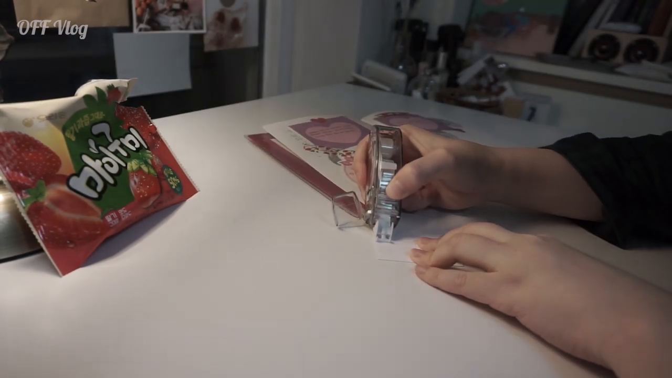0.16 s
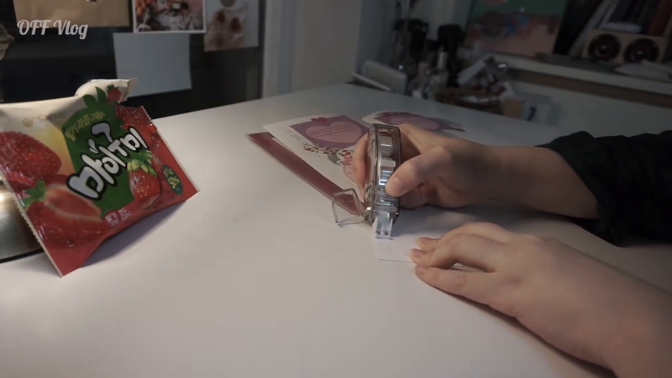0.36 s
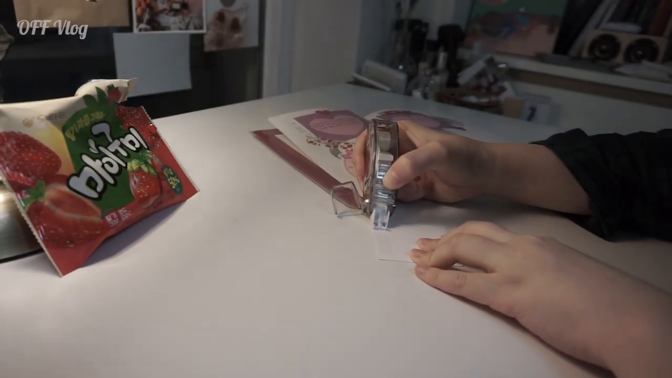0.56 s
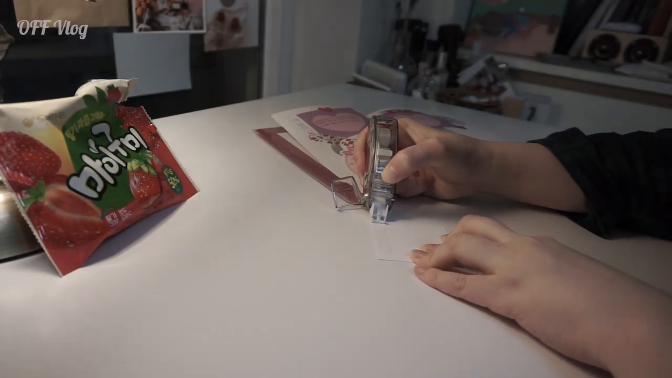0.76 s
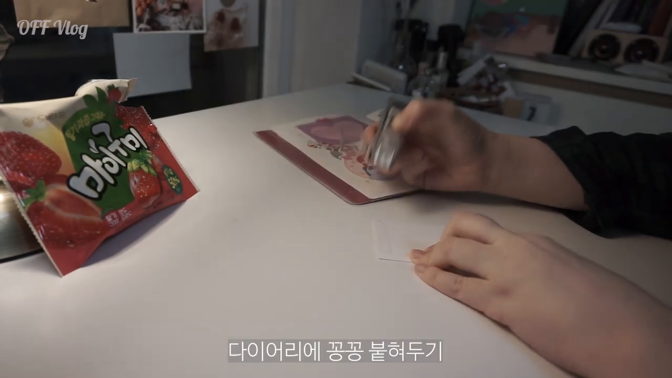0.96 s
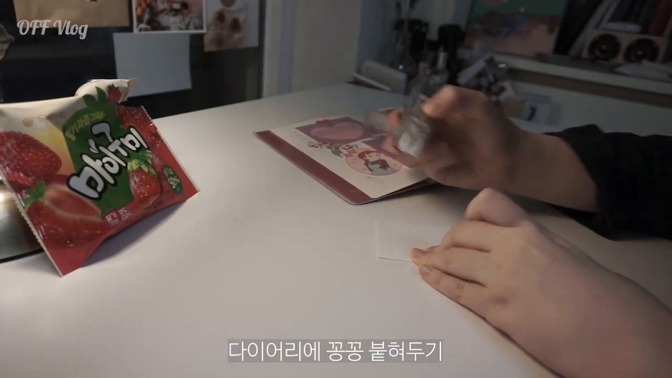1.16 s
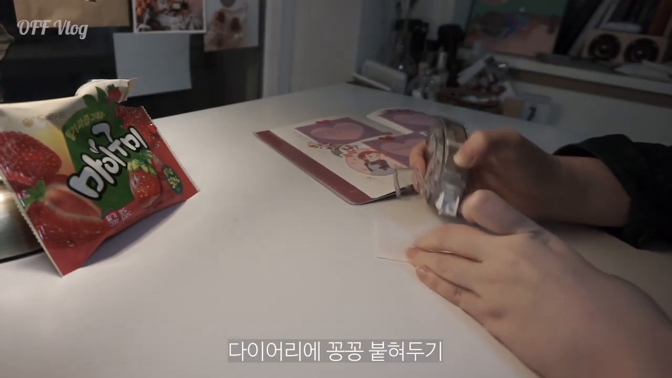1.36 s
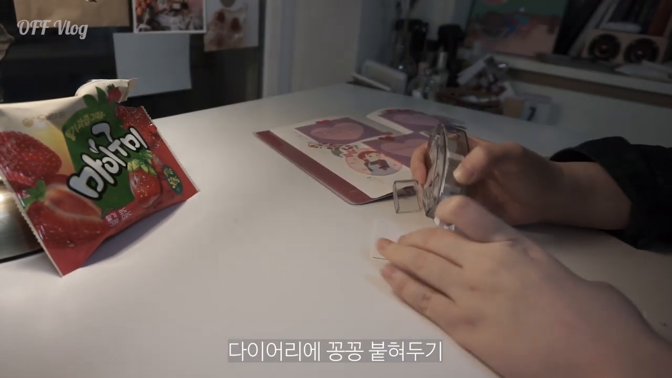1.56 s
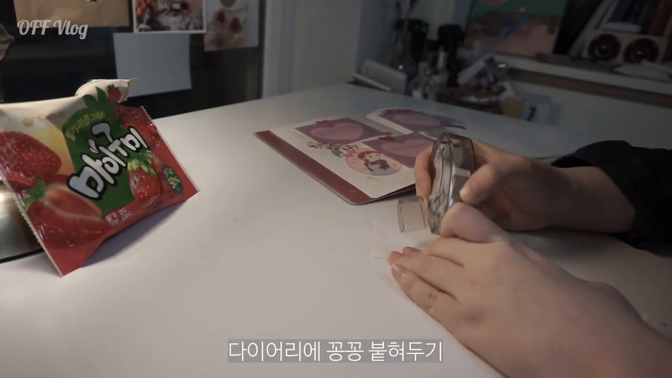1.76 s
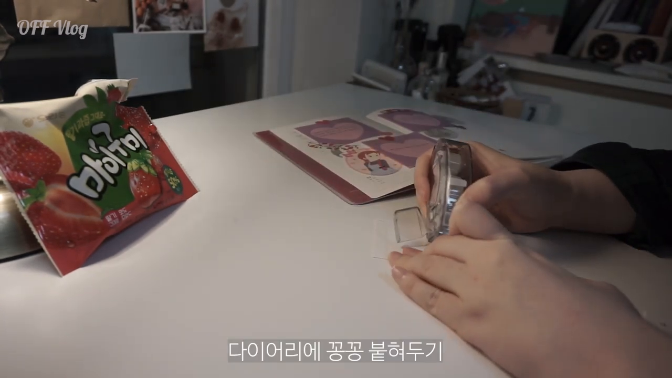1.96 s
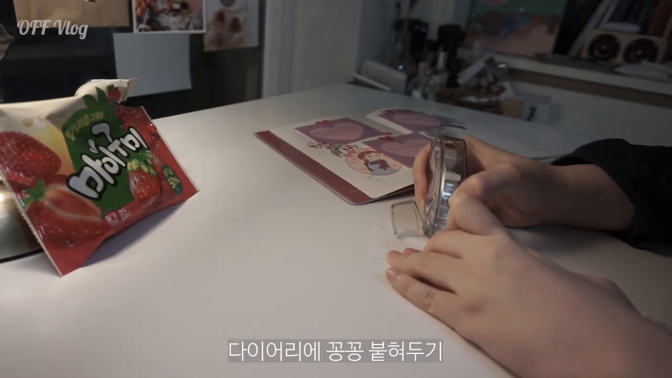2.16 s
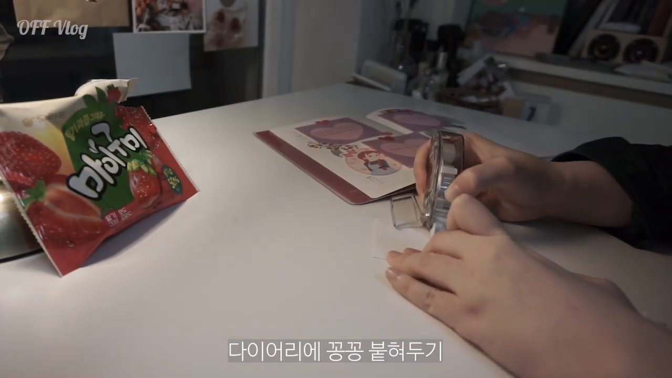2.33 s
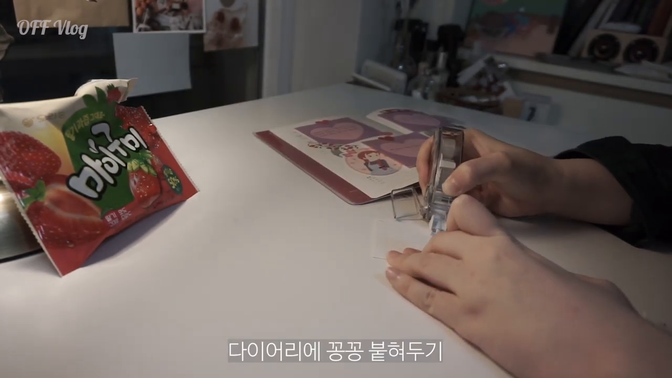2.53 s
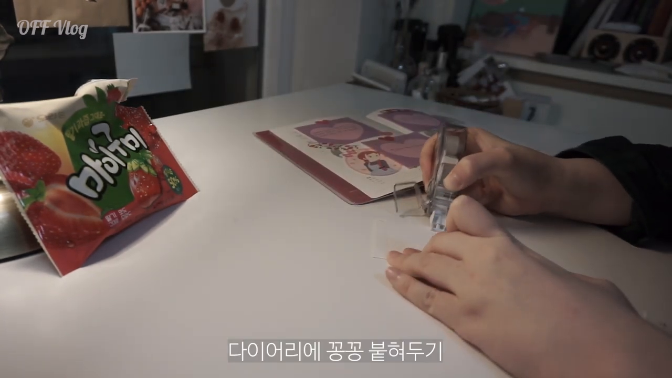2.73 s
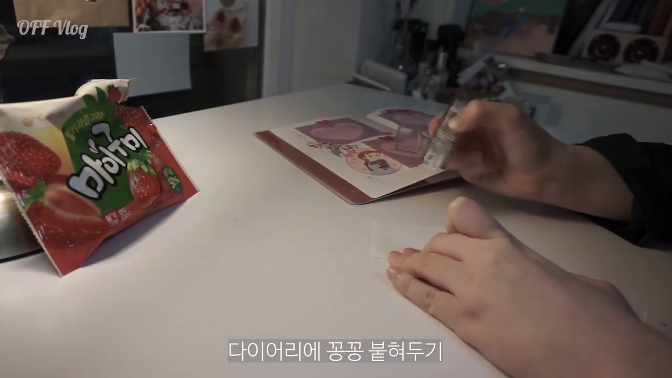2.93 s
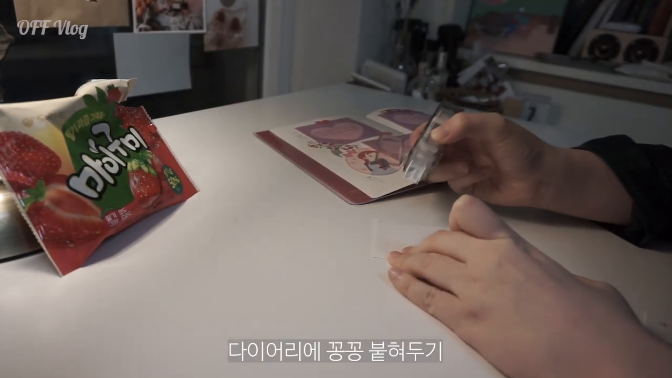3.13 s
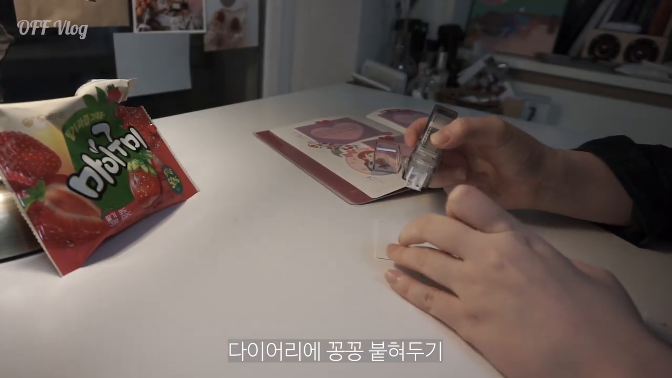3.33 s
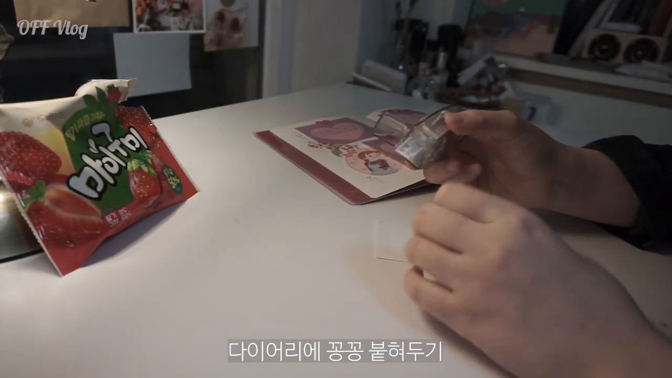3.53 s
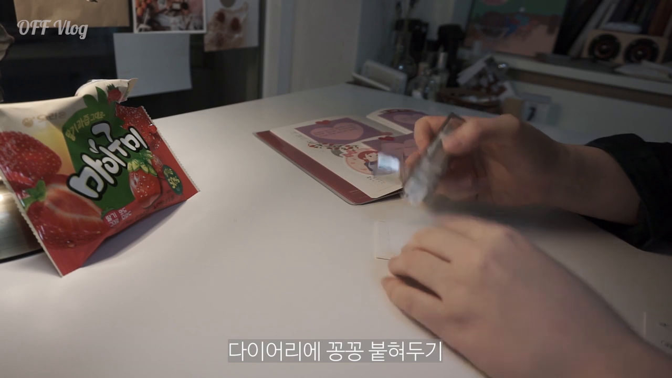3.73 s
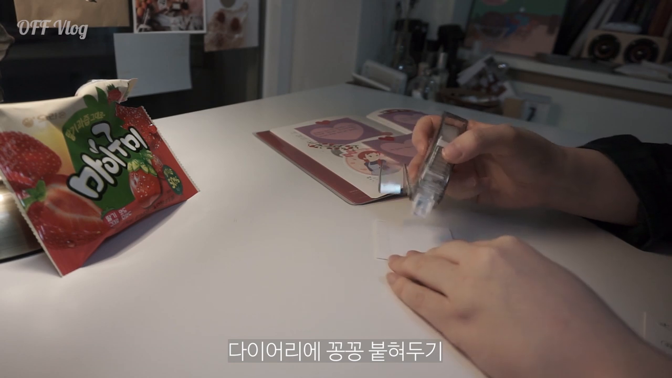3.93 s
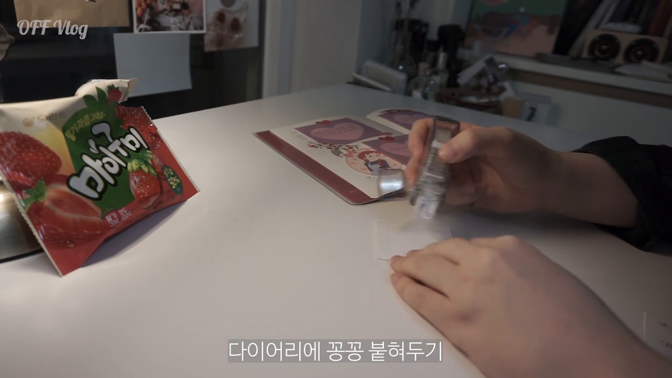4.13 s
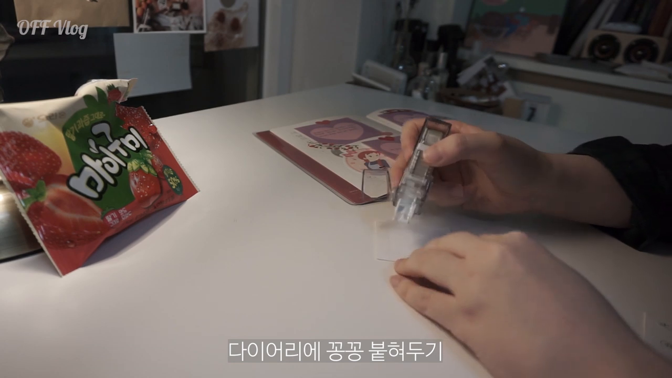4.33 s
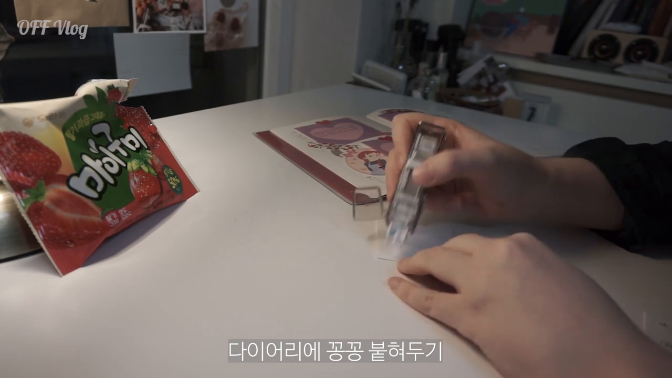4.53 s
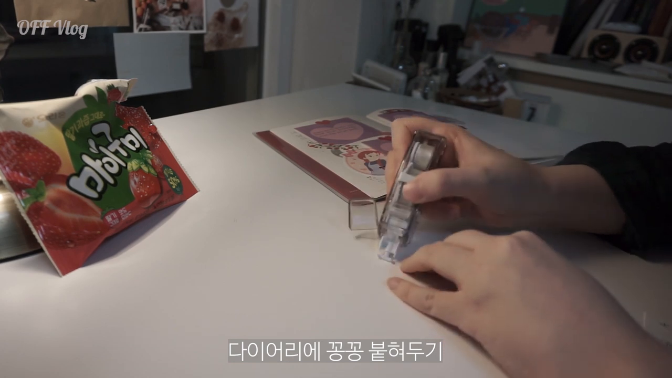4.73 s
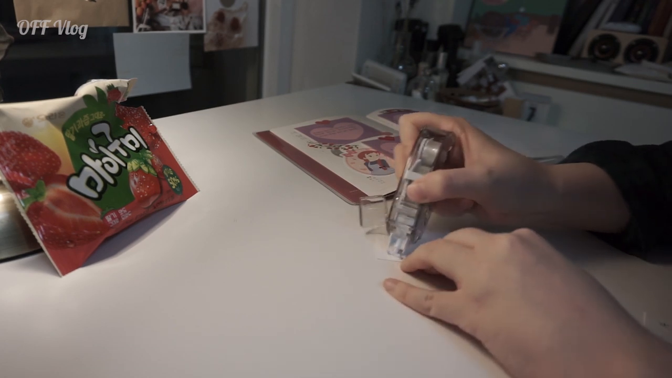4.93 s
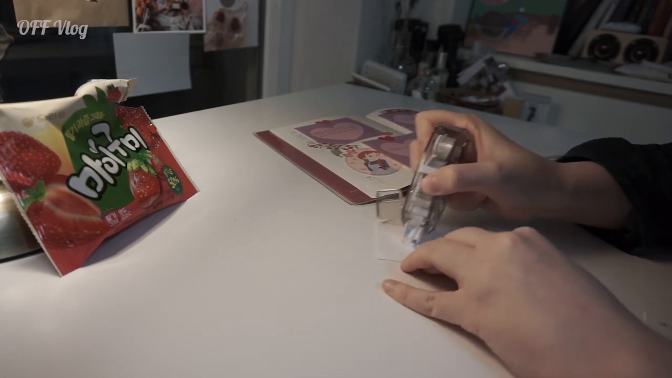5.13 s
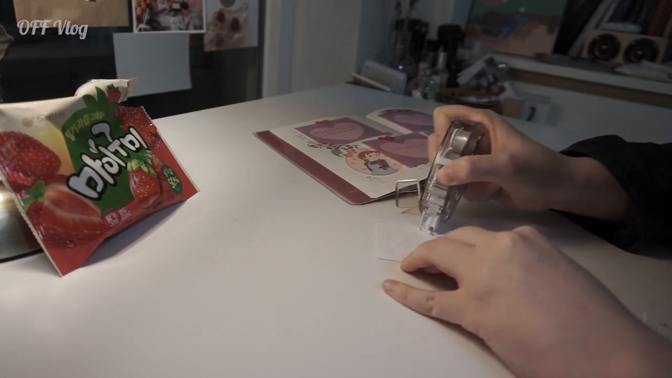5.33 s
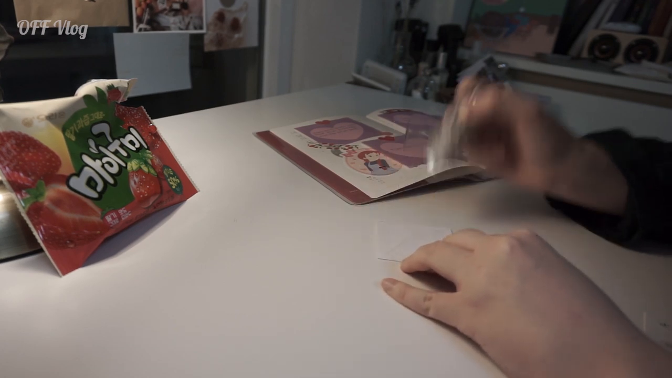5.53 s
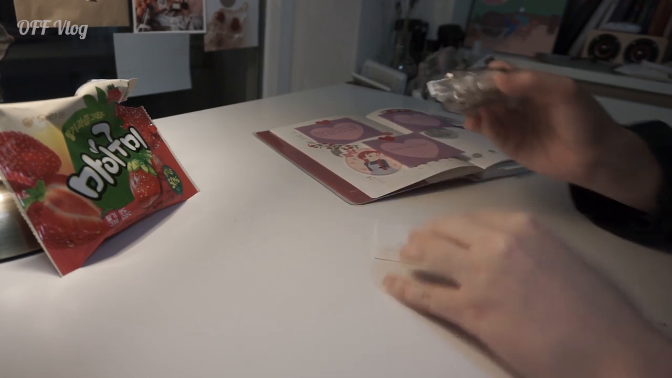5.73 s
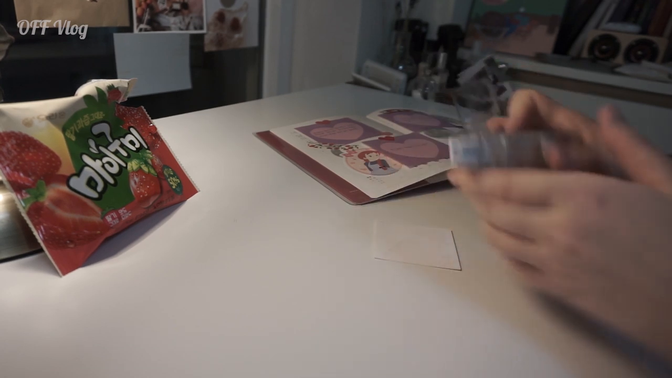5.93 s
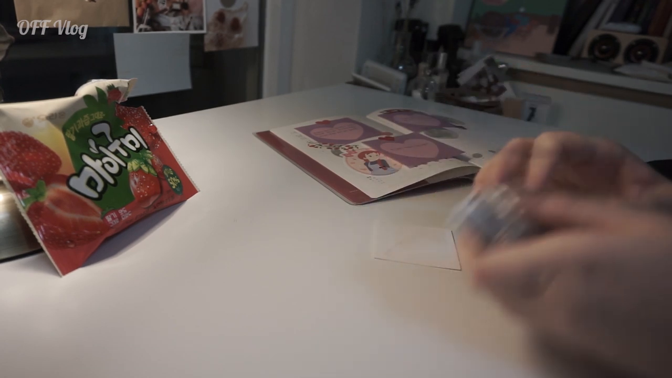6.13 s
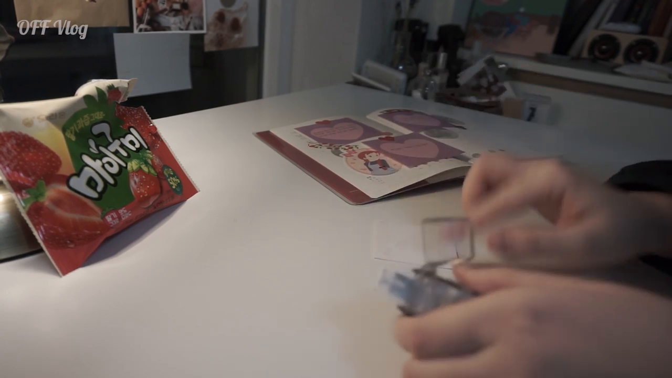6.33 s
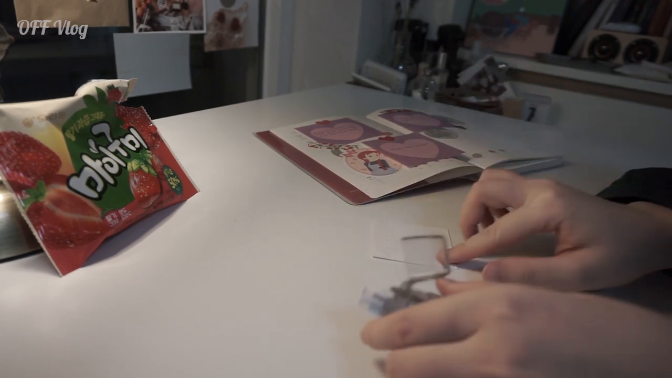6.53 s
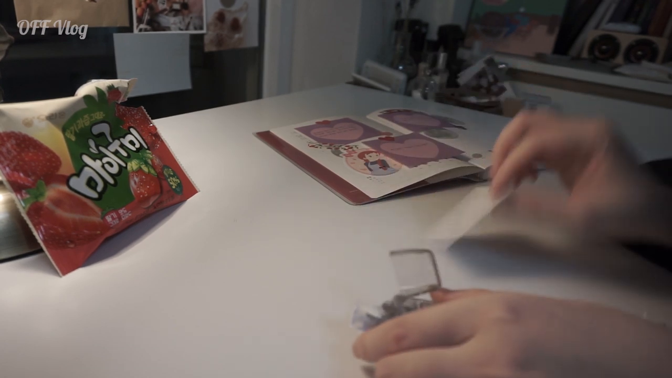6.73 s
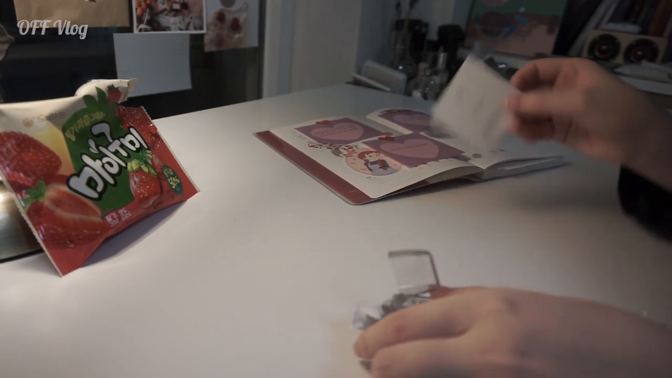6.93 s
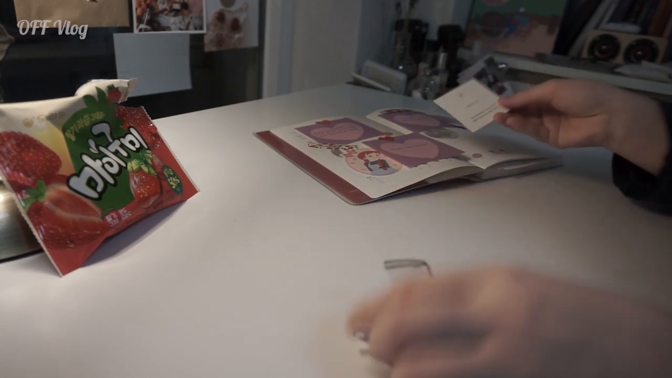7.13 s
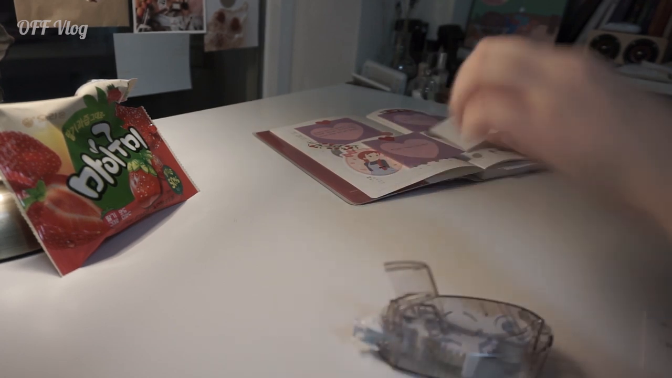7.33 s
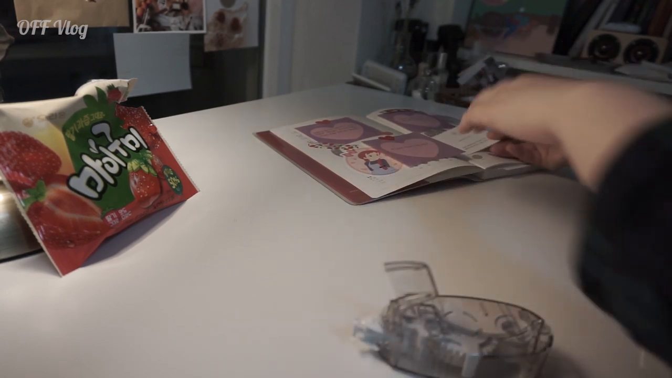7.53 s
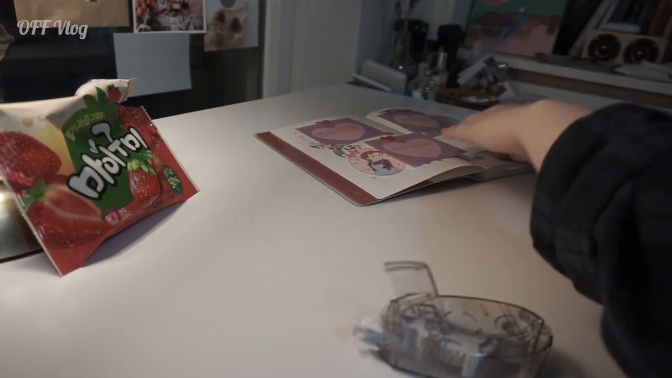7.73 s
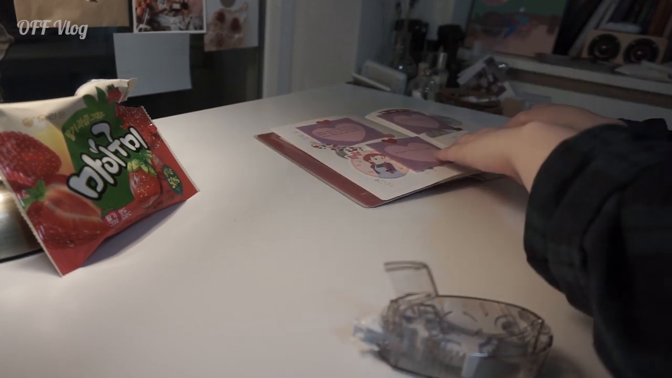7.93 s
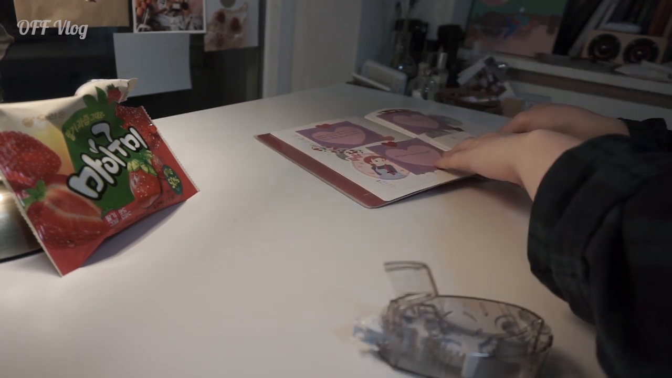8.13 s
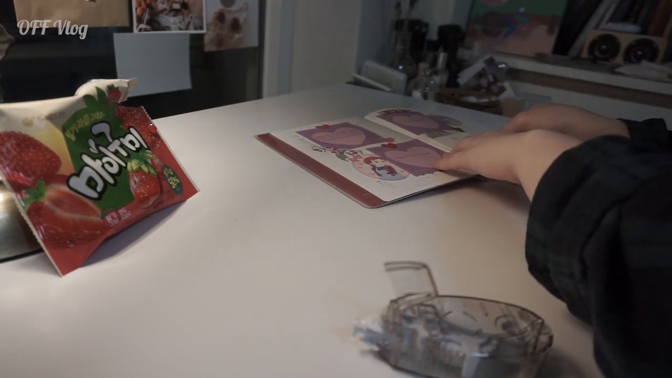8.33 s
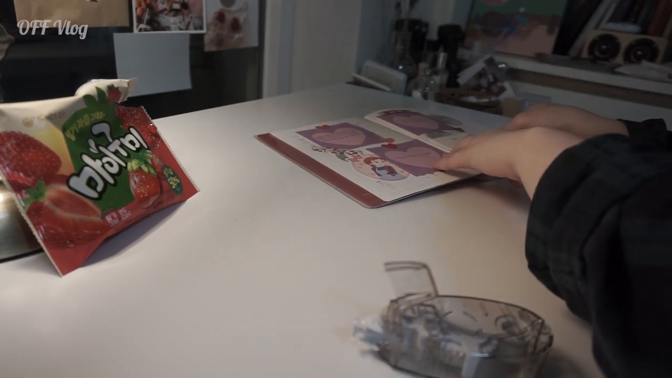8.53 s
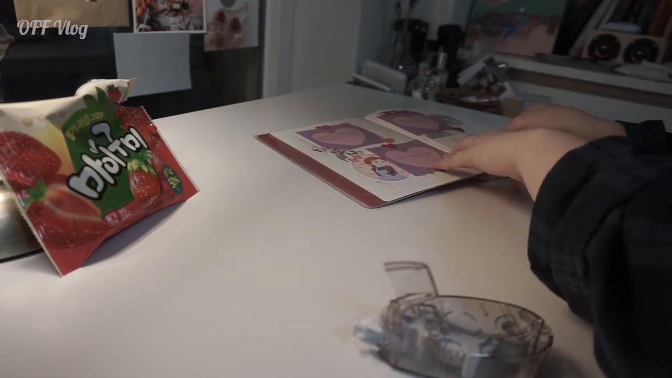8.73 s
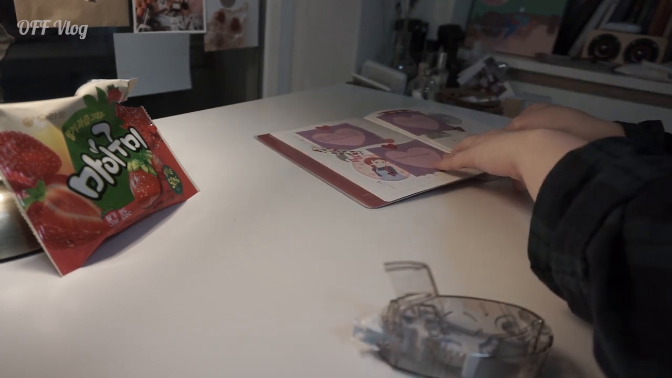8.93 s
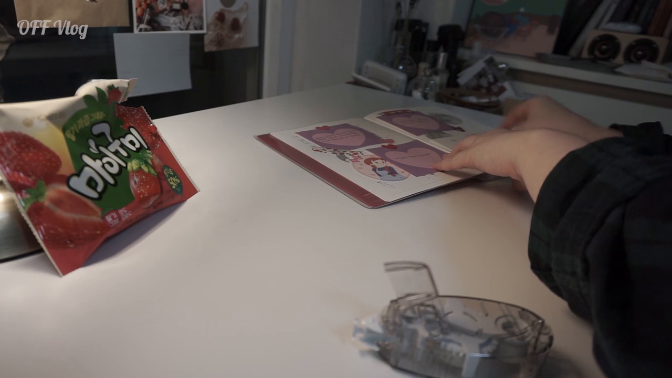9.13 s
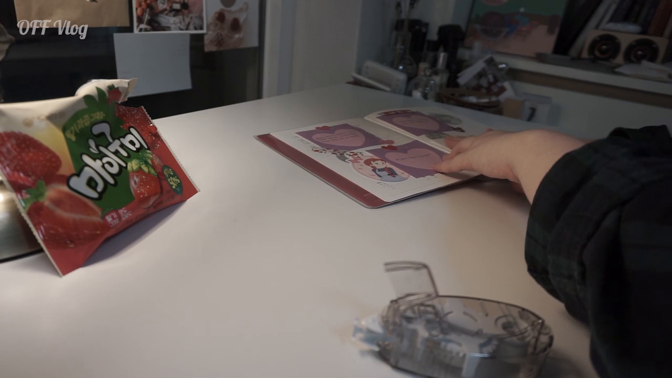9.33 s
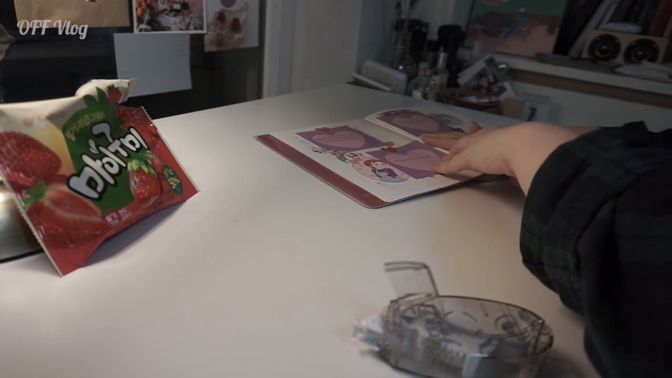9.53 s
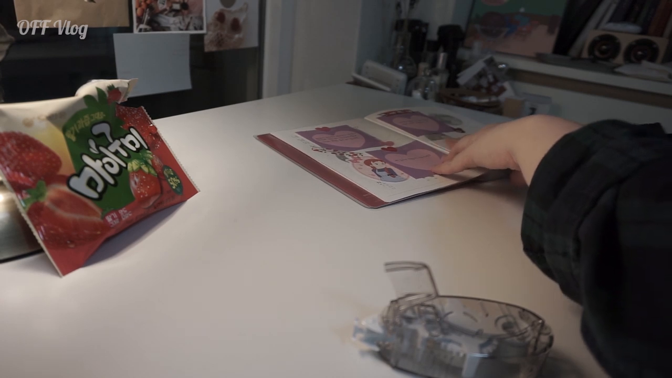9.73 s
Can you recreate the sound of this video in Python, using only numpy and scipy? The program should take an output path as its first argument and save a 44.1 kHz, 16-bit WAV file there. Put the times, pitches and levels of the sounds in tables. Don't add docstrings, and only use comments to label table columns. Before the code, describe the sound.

A plastic tape runner clicks and rasps across paper three times, is set down with hard knocks, and hands rustle paper in a quiet humming room.

```python
import sys
import numpy as np
from scipy import signal
from scipy.fft import rfft, irfft, next_fast_len
from scipy.io import wavfile
from scipy.ndimage import uniform_filter1d, map_coordinates

SR = 44100
rng = np.random.default_rng(int(sys.argv[2]) if len(sys.argv) > 2 else 0)


def wav_record(signal):
    frames = np.transpose(np.atleast_2d(signal))
    bounded = np.clip(frames, -1, 1)
    quanta = np.round(bounded * 32767).astype(np.int16)
    wavfile.write(sys.argv[1], SR, quanta)


def volts_from_decibels(level):
    exponent = np.asarray(level, float) / 20
    return 10 ** exponent


N = 430857

# frequency_hz, density_db (per Hz)
AIR_SPECTRUM = [(15, -57.5), (25, -25), (46, -26), (60, -36), (135, -21), (166, -21), (269, -8.5),
                (290, -11), (405, -18.5), (448, -17), (509, -18), (827, -20), (916, -16), (1210, -27),
                (11200, -37.5), (14600, -89), (22000, -120)]
# frequency_hz, correlation (-1 to 1)
AIR_LIKENESS = [(60, 1), (130, 0.828), (270, 0.95), (580, 0.385), (1230, -0.18), (2600, -0.37),
                (5540, -0.21), (11800, -0.137)]
# pitch_hz, level_db, flutter_db
MOTOR_LINES = [(37, -74, -1), (122.6, -100, 3), (171, -69.5, 4), (267, -56.5, 2.5), (634, -89, 0.5),
               (902, -73, 5.5)]
# frequency_hz, t60_s, left-right correlation (0 to 1)
ROOM_DECAY = [(200, 0.39, 1), (1000, 0.43, 0.64), (2860, 0.31, 0.296), (10000, 0.35, 0.026)]
# delay_s, level_db
REFLECTIONS = [(.0031, -14.5), (.0052, -18.5), (.0085, -15.5), (0.011, -21)]

# pitch_hz, width_hz, level_db
DESK_MODES = [(114, 45, -8), (153.8, 20, 0.5), (272.3, 27.8, 2.5), (336.7, 10.9, 2.5), (374, 30.1, -4),
              (499, 58, -6.5), (600, 35, -4.5), (755, 37.2, 4), (887, 38, 0), (1073, 170, -6),
              (1428, 27, -3), (1524, 34, -1), (1900, 71, -17)]
# pitch_hz, level_db
CASE_MODES = [(1250, 2), (1400, -0.5), (1670, -0.5), (1900, -1), (2060, 0.5), (3030, 2), (4200, 7),
              (5000, -1), (6500, -2.5)]
# pitch_hz, width_hz, level_db
SHELL_MODES = [
    [(4200, 1860, -12), (5210, 250, -16.5), (6417, 260, -9), (7780, 380, -4), (8500, 290, -12),
     (9370, 940, -8), (10677, 880, -4.5)],
    [(4246, 1020, -11), (5030, 480, -13.5), (6632, 420, -6.5), (7760, 395, -8), (8620, 390, -6),
     (9820, 510, -2.5), (10840, 1400, -3)],
    [(4200, 880, -12), (4876, 610, -7.5), (6454, 490, -8.5), (7500, 650, -9), (8170, 310, -2),
     (9210, 660, -5), (10430, 1040, -5)],
]
# frequency_hz, left_right_db
SHELL_BEAM = [
    [(4500, 3), (6500, 2.5), (8000, 0), (10000, -0.5)],
    [(4500, 3), (6500, 0), (8000, 0.5), (10000, -2)],
    [(4500, 2), (6500, 5), (8000, 4.5), (10000, 0.5)],
]
# case_knock_db, left_right_db, left_right_scatter_db
GRIPS = [
    (-44.5, -2.5, 3),
    (-43.5, -7, 2.5),
    (-49, -12, 4.5),
]
TICK_SCATTER_DB = [-32.5, -26.5, -24.5]
GRIP_CHANGES_S = [1.5, 4]

# start_s, hold_s, fade_s (per 20 dB), body_db, hiss_over_body_db
SLIDES = [(1.166, 0.37, 0.34, -51.5, 0.5), (2.997, 0.202, 0.57, -69, 7.5), (3.48, 0.02, 0.06, -63.5, 11.5),
          (3.54, 0.083, 1, -67, -10), (3.766, 0.043, 0.3, -60, 6.5), (4.392, 0.162, 0.23, -59.5, 2.5),
          (4.735, .01, 1.2, -64, -7), (5.84, 0.15, 0.5, -64.5, 13), (5.873, 0.0092, 0.16, -59, 14.5),
          (6.114, 0.009, 0.21, -63.5, 11.5), (6.369, 0.064, 0.3036, -58, 7), (6.565, 0.14, 0.2, -57.5, 5),
          (6.726, 0.0066, 0.4, -62, 11.5), (6.82, 0.25, 1, -62.5, 5), (7.336, 0.67, -0.7, -65.5, 2),
          (9.135, 0.042, 0.05, -65, 7), (9.249, 0.01, 0.28, -52, 4), (9.382, 0.17, 0.03, -59, 12.5),
          (9.67, 0.13, 0.2934, -55.5, 11.5)]
# start_s, hold_s, fade_s (per 20 dB), level_db
ROCKS = [
    (7.08, 0.0126, 0, -58),
    (7.23, 0.47, -0.01, -47.5),
]
# frequency_hz, level_db
SLIDE_BODY = [(300, -46), (700, -4.5), (1100, -5), (2500, -5), (4000, -6.5), (7000, -16.5), (12000, -20.5)]
# frequency_hz, level_db
SLIDE_HISS = [(1500, -28), (3000, -9), (5000, -6), (7000, -4), (9000, -0.5), (11000, -1)]
# centre_s, length_s, level_db, centre_hz
PAPER_SCUFFS = [(0.334, 0.13, -59, 1530), (0.334, 0.084, -58.5, 4420), (4.813, .05, -55, 4500),
                (4.904, 0.0161, -45, 2130), (5.46, 0.035, -53, 3500), (5.885, .07, -66, 9000),
                (5.967, 0.056, -56, 5140), (6.42, 0.128, -56, 5480), (6.692, 0.048, -51, 5730),
                (6.758, 0.046, -45.5, 5200), (7.019, 0.07, -44.5, 1830), (9.26, 0.0283, -48, 5420)]

# start_s, peak_db, centre_hz, snap_db, t60_s
CASE_CONTACTS = [(.821, -38.5, 1430, -9.5, 0.028), (0.9347, -23.5, 2016, -19.5, 0.018),
                 (0.9488, -27, 1400, -11, 0.0088), (0.9948, -36, 1600, -23, 0.012),
                 (2.858, -42, 1470, -9.5, 0.0094), (3.464, -43.5, 1660, -13, 0.032),
                 (5.0961, -36.5, 1510, -2, 0.0089), (5.463, -40.5, 1520, -7, 0.018),
                 (5.79, -34, 2455, -5.5, 0.024), (6.131, -31.5, 1900, -8, 0.02),
                 (6.142, -30, 2120, -15, 0.0326), (6.434, -35, 2100, -34, 0.017),
                 (7.3247, -55.5, 1456, -12, 0.025), (7.433, -45.5, 1260, -18.5, 0.0155)]
# start_s, peak_db, centre_hz, snap_db, t60_s
PAPER_CONTACTS = [(0.8578, -40, 1580, 0.5, 0.0106), (.88, -39.5, 1615, -3.5, .012),
                  (.9347, -17, 7500, -26.5, .004), (.9465, -27, 8500, -16, 0.0074),
                  (0.9516, -25.5, 1284, -16.5, 0.0049), (0.9525, -21.5, 3120, -6.5, 0.0068),
                  (0.9765, -34, 9000, -7.5, .006), (0.988, -24, 8500, -10.5, 0.0065),
                  (0.9907, -23, 8370, -14, 0.0104), (0.9916, -30.5, 1900, -0.5, 0.008),
                  (0.9957, -28, 8300, -6, .005), (1.6506, -58, 902, 6.5, .005),
                  (2.715, -27.5, 7670, -14.5, 0.006), (2.7157, -35, 1638, -30, .04),
                  (2.8546, -28, 6230, -17.5, 0.0055), (2.8586, -35, 4470, -3, 0.0085),
                  (4.7868, -42, 4500, -10, .008), (4.832, -41, 7000, -1, .006),
                  (4.95, -32, 4500, -22, .006), (4.872, -55, 4820, -8, .005),
                  (5.438, -47, 4480, -14.5, .012), (5.459, -43.5, 9500, -15.5, .005),
                  (5.4845, -45, 9600, -22, .006), (5.506, -43.5, 4500, -10, .004),
                  (5.5079, -39, 4200, -12.5, .006), (5.511, -37.5, 2960, -8, 0.0084),
                  (5.5203, -34, 9000, -24, .004), (5.529, -27, 9430, -13.5, .004),
                  (5.53, -21, 9500, -15, 0.0052), (5.5364, -30, 10000, -11.5, .004),
                  (6.44, -33.5, 3400, -25, .008), (6.7799, -36, 4300, 0, .005),
                  (6.856, -49, 2130, 3.5, .005), (7.368, -42.5, 1300, -11.5, .005),
                  (9.1111, -45.5, 2200, 4.5, 0.0145)]
# start_s, peak_db
PEEL_CLICKS = [(0.917, -26), (0.921, -25.5), (0.9246, -24.5), (0.9269, -20.5), (0.9309, -29.5)]
# start_s, peak_db, centre_hz, snap_db
KNOCK_CLACKS = [(1.9928, -42, 1400, -7), (1.9974, -24.5, 1610, -11), (4.7446, -32, 1500, -6.5),
                (4.754, -34.5, 910, -28), (6.4517, -14, 2200, -23.5), (6.4577, -19.5, 2256, -28.5),
                (6.469, -25, 2250, -32), (6.49, -32, 2470, -34), (6.502, -27.5, 1970, -36.5),
                (7.0171, -16.5, 1900, -24), (7.0218, -15, 1500, -19.5), (7.206, -32, 1420, -23),
                (7.2447, -35.5, 1390, -27), (7.2974, -39, 1368, -16), (9.1195, -25, 1380, -10.5),
                (9.121, -36.5, 2930, -5), (9.3549, -42, 2640, -6), (9.36, -42.5, 1052, -13)]
# start_s, peak_db, centre_hz, loss_db (one octave away), t60_s
DESK_THUDS = [(1.9951, -30, 414, 3, 0.012), (4.745, -31, 318, 7, 0.0087), (4.7555, -37.5, 161, 11, 0.009),
              (6.4512, -21.5, 590, 1.5, 0.037), (6.4577, -20.5, 760, 9, 0.025),
              (6.466, -30.5, 310, 6, 0.047), (6.485, -28, 307, 0, 0.022),
              (7.0166, -13.5, 353.5, 6.5, 0.0052), (7.0255, -22.5, 600, -0.5, 0.0099),
              (7.0315, -20, 760, 15, 0.0072), (7.044, -29, 337, 14, 0.012), (7.207, -33, 282, 5, 0.014),
              (7.2435, -37, 280, 6, 0.017), (7.297, -34.5, 400, 6.5, 0.0226),
              (9.1189, -30, 380, 7.5, 0.021), (9.361, -29, 238.3, 6, 0.01)]

# time_s, pressure_db
TIP_PRESSURE = [
    [(0.0, -50), (0.208, -48), (0.27, -53)],
    [(0.39, -51.5), (0.572, -48), (0.818, -56.5), (0.9, -62)],
    [(2.03, -97), (2.058, -51.5), (2.17, -49), (2.244, -45.5), (2.616, -52.5), (2.712, -60), (2.836, -56),
     (2.88, -65)],
    [(4.88, -55), (4.98, -51), (5.2, -49), (5.322, -41.5), (5.41, -53), (5.5, -56)],
]
# start_s, peak_db, tilt_db (per octave)
FIRST_TICKS = [(0.0074, -11.5, -3), (0.0918, -9, 1), (0.1467, -11, -3), (0.191, -10, -4), (0.24, -14.5, -5),
               (0.3921, -13.5, 6.5), (0.4364, -28.5, -8.5), (0.4678, -11, -0.5), (0.5123, -12, 8),
               (0.5562, -7.5, -0.5), (0.607, -11.5, 0.5), (0.654, -10, 0), (0.7214, -11.5, 0),
               (0.7778, -11.5, -3.5)]
# start_s, peak_db, tilt_db (per octave)
SECOND_TICKS = [(2.0654, -21, -8), (2.1014, -12.5, -1), (2.142, -13, 0.5), (2.1973, -11, 1.5),
                (2.232, -12, 0), (2.266, -13.5, 1), (2.3022, -11.5, 0), (2.3567, -11.5, 1.5),
                (2.414, -11.5, -3), (2.4551, -9, 4), (2.493, -10, -2.5), (2.508, -21, -11),
                (2.558, -12.5, 1), (2.617, -12.5, 0), (2.7383, -38.5, -2), (2.7545, -11, 0),
                (2.805, -11, 8)]
# start_s, peak_db, tilt_db (per octave)
THIRD_TICKS = [(4.899, -32, 0), (4.9183, -15, 5), (4.968, -40.5, 12), (4.991, -13, 6),
               (5.008, -16.5, -11.5), (5.025, -12.5, -8.5), (5.0367, -13, 7), (5.0759, -14.5, 0.5),
               (5.0953, -21, -7), (5.1076, -15, -3), (5.1359, -11.5, -2), (5.166, -11, 0), (5.1943, -12, 3),
               (5.2161, -14, 1), (5.235, -15.5, -2), (5.254, -13.5, 0), (5.275, -14.5, -1),
               (5.2994, -13, 1), (5.328, -12, 1), (5.355, -13, 0), (5.3777, -16, -2), (5.3938, -14.5, 1)]


def unit(x):
    return x / np.sqrt(np.mean(x ** 2) + 1e-20)


def peak(x):
    return x / np.max(np.abs(x))


def along(points, hz):
    f, v = np.transpose(points)
    return np.interp(np.log(hz + 1), np.log(f + 1), v)


def spectrum(points):
    return lambda hz: volts_from_decibels(along(points, hz))


def wobble(rate):
    knots = rng.standard_normal(int(N * rate / SR) + 4)
    return map_coordinates(knots, [np.arange(N) * rate / SR])


def filtered(x, response):
    n = x.shape[-1]
    m = next_fast_len(n + 8192)
    return irfft(rfft(x, m) * response(np.fft.rfftfreq(m, 1 / SR)), m)[..., :n]


def resonances(modes):
    def response(f):
        total = 0
        for k, (centre, width, db) in enumerate(modes):
            damping = 1j * f * width
            total = total + (-1) ** k * volts_from_decibels(db) * damping / (centre * centre - f * f + damping)
        return total
    return response


def rush(response, alike, grain_db=0):
    grain = volts_from_decibels(2 * grain_db * np.tanh(wobble(250) / 2))
    pair = rng.standard_normal((2, N)) * grain

    def mid_side(hz):
        turn = np.arccos(np.clip(along(alike, hz), -1, 1)) / 2
        return response(hz) * np.array([np.cos(turn), np.sin(turn)])
    mid, side = filtered(pair, mid_side)
    return unit(np.array([mid + side, mid - side]))


def swells(rows, rise):
    t, power = np.arange(N) / SR, np.zeros(N)
    for s, hold, fade, db in rows:
        fade = max(fade, .01)
        a, b = int(max(s - 3 * rise * fade, 0) * SR), int((s + hold + 3 * fade) * SR)
        now = t[a:b]
        outside = np.maximum(np.maximum((s - now) / rise, now - s - hold), 0)
        power[a:b] += volts_from_decibels(2 * (db - 20 * outside / fade))
    return np.sqrt(power)


def add(out, s, sound, pan_db, near_db, wet_db):
    hz, t, z = signal.stft(rng.standard_normal((2, SR // 4)), SR, nperseg=128)
    band, t60, alike = np.transpose(ROOM_DECAY)
    turn = np.arccos(np.clip(along(np.c_[band, alike], hz), -1, 1))[:, None] / 2
    mid, side = np.cos(turn) * z[0], np.sin(turn) * z[1]
    z = np.array([mid + side, mid - side])
    scatter = volts_from_decibels(near_db + along([(4500, 3), (8000, 0)], hz)[:, None] - 60 * t / .05)
    reverberation = volts_from_decibels(wet_db - 60 * t / along(np.c_[band, t60], hz)[:, None])
    tail = signal.istft(z * (scatter + reverberation), SR, nperseg=128)[1]
    path = np.pad(tail, ((0, 0), (75, 0)))
    for delay, db in REFLECTIONS:
        path[:, int(delay * rng.normal(1, .03) * SR)] += volts_from_decibels(db)
    path[0, 1] += volts_from_decibels(pan_db / 2)
    path[1, 0] += volts_from_decibels(-pan_db / 2)
    heard = signal.fftconvolve(np.atleast_2d(sound), path, axes=1)
    at = round(s * SR)
    out[:, at:at + heard.shape[1]] += heard


def background(duck):
    t = np.arange(N) / SR
    hum = 0
    for hz, db, flutter_db in MOTOR_LINES:
        level = volts_from_decibels(db + 1 + flutter_db * wobble(24))
        hum = hum + level * np.sin(2 * np.pi * hz * t + 0.007 * hz * wobble(5.5))
    hum = hum + volts_from_decibels(-81.5) * np.array([wobble(90), wobble(90)])
    color = lambda hz: volts_from_decibels(along(AIR_SPECTRUM, hz) + along([(6000, 0), (11000, 3)], hz))
    air = volts_from_decibels(-56 + .6 * wobble(2.5)) * rush(color, AIR_LIKENESS)
    low = filtered(air, lambda hz: 1 / (1 + (hz / 1100) ** 4))
    return duck * (hum + low) + air - low


def hands():
    rise = 0.63
    body = swells([row[:4] for row in SLIDES], rise) * volts_from_decibels(0.63 * wobble(6.7))
    hiss_rows = [(s, hold, fade, db + hiss_db) for s, hold, fade, db, hiss_db in SLIDES]
    hiss = swells(hiss_rows, rise) * volts_from_decibels(1.1 * wobble(7.6))
    rock = swells(ROCKS, 0.097) * volts_from_decibels(1.7 * wobble(30))
    body = body * rush(spectrum(SLIDE_BODY), [(1000, 0.37), (4000, 0.087)], grain_db=1.0)
    hiss = hiss * rush(spectrum(SLIDE_HISS), [(5000, 0.053)], grain_db=1.5)
    rock = rock * rush(resonances(DESK_MODES[2:5]), [(300, 0.992)])
    return body + hiss + rock


def scuffs():
    out, t = np.zeros((2, N)), np.arange(N) / SR
    grit = rush(np.ones_like, [(3000, 0.21)], grain_db=5.0)
    for s, length, db, hz in PAPER_SCUFFS:
        a, b = round((s - length) * SR), round((s + length) * SR)
        resonance = resonances([(hz, .5 * hz, 0)])
        band = filtered(grit[:, a:b], lambda f: resonance(f) ** 2)
        out[:, a:b] += volts_from_decibels(db) * unit(band) * np.exp(-4.5 * ((t[a:b] - s) / length) ** 2)
    return out


def clack(t, centre_hz, snap_db, t60, width):
    rattle = lambda life: rng.standard_normal(len(t)) * volts_from_decibels(-60 * t / max(life, .003))
    ring = resonances([(centre_hz, width * centre_hz, 0), (2.52 * centre_hz, centre_hz, -15)])

    def body(f):
        soft = (1 + 1j * f / (1.83 * centre_hz)) ** 2
        return ring(f) / soft * f / (f - .4j * centre_hz)
    blow = rattle(t60)
    blow[0] = 15
    snap = filtered(rattle(.5 * t60), resonances([(7040, 17000, 0)]))
    return peak(filtered(blow, body)) + volts_from_decibels(snap_db + 14.0) * peak(snap)


def case_tap(t, centre_hz, snap_db, t60):
    touch = 0.33 * rng.standard_normal(len(t)) * volts_from_decibels(-60 * t / (0.12 * t60))
    touch[3] = 1
    modes = []
    for hz, db in CASE_MODES:
        width = np.log(1000) / np.pi / t60 * hz / 1500
        modes.append((hz, width, db - 16 * np.log2(hz / centre_hz) ** 2))
    snap = np.diff(rng.standard_normal(len(t)), prepend=0) * volts_from_decibels(-60 * t / (0.685 * t60))
    return peak(filtered(touch, resonances(modes))) + volts_from_decibels(snap_db + 18.5) * peak(snap)


def thud(t, centre_hz, loss_db, t60):
    push = 0.1147 * rng.standard_normal(len(t)) * volts_from_decibels(-60 * t / max(t60, .003))
    push[0] = 1
    modes = [(hz, w, db - loss_db * np.log2(hz / centre_hz) ** 2) for hz, w, db in DESK_MODES]
    return peak(filtered(push, resonances(modes)))


def taps():
    out, t = np.zeros((2, N + SR)), np.arange(SR // 4) / SR
    peel = []
    for s, db in PEEL_CLICKS:
        pitch_hz = 10300 / 2 ** (124 * (s - PEEL_CLICKS[0][0]))
        peel.append((s, db, pitch_hz, -30, 0.0034))
    for s, db, centre_hz, snap_db, t60 in CASE_CONTACTS:
        sound = volts_from_decibels(db) * case_tap(t, centre_hz, snap_db, t60)
        add(out, s, sound, pan_db=-8.5, near_db=-28.0, wet_db=-39.0)
    for s, db, centre_hz, snap_db, t60 in list(PAPER_CONTACTS) + peel:
        sound = volts_from_decibels(db) * clack(t, centre_hz, snap_db, t60, width=0.12)
        add(out, s, sound, pan_db=-1.5, near_db=-33.5, wet_db=-37.0)
    for s, db, centre_hz, snap_db in KNOCK_CLACKS:
        effort = volts_from_decibels(.5 * (db + 15.5))
        t60, width = 0.01 + 0.036 * effort, 0.11 + 0.2 * effort ** 2
        sound = volts_from_decibels(db) * clack(t, centre_hz, snap_db, t60, width)
        add(out, s, sound, pan_db=-7.5, near_db=-28, wet_db=-33.5)
    for s, db, centre_hz, loss_db, t60 in DESK_THUDS:
        sound = volts_from_decibels(db) * thud(t, centre_hz, loss_db, t60)
        add(out, s, sound, pan_db=-.6, near_db=-39.5, wet_db=-37)
    return out[:, :N]


def tip_pressure():
    t = np.arange(N) / SR
    out = 0
    for rows in TIP_PRESSURE:
        s, db = np.transpose(rows)
        fade = np.clip(np.minimum(t - s[0], s[-1] - t) / .03 + 1, 0, 1)
        out = out + fade * volts_from_decibels(np.interp(t, s, db))
    return out


def tape_speed():
    ticks = FIRST_TICKS + SECOND_TICKS + THIRD_TICKS
    s = np.array([s for s, db, _ in ticks if db > -24])
    octaves = np.clip(-np.log2(np.diff(s) * 22), -1, 2)
    speed = np.interp(np.arange(N) / SR, s[1:] - np.diff(s) / 2, octaves)
    return uniform_filter1d(speed, size=int(.07 * SR))


def drag():
    t = np.arange(N) / SR
    rasp, fast = tip_pressure(), tape_speed()
    rumble = rasp * volts_from_decibels(-8 + 4.5 * fast)
    fizz = (rasp * volts_from_decibels(50.5)) ** 0.9 * volts_from_decibels(-45.5 + 4.5 * fast)
    loose = resonances([(1400, 84.5, -3.5), (1656, 118, -2.0), (3600, 3700, -15.5)])
    gripped = resonances([(1410, 360, -1.6), (3110, 3600, -1.4)])
    loose = rush(loose, [(1500, 0.564)], grain_db=4.0)
    gripped = rush(gripped, [(1500, 0.71)], grain_db=4.0)
    case = np.where(t < 4, loose, gripped)
    desk = resonances([(386, 136.5, -0.5), (565, 290, -9.5), (699, 45.7, -3.5)])
    desk = rush(desk, [(500, 0.95)], grain_db=1.5)
    shells = []
    for modes in SHELL_MODES:
        damped = resonances([(hz, 2.4 * w, 0.48 * db) for hz, w, db in modes])
        shells.append(rush(damped, [(5000, 0.32), (10000, 0.085)], grain_db=3))
    shell = np.choose(np.digitize(t, GRIP_CHANGES_S), shells)
    return rasp * volts_from_decibels([[-2.5], [2.5]]) * case + rumble * desk + fizz * shell * volts_from_decibels(-3.0)


def shell_ring(t, stroke, tilt_db, phases, ports):
    side = np.array([[.5], [-.5]])
    ring = 0
    for (hz, width, level), phase, port in zip(SHELL_MODES[stroke], phases, ports):
        beam_db = side * along(SHELL_BEAM[stroke], hz)
        level_db = level + tilt_db * np.log2(hz / 7500) + beam_db + 1.5 * rng.normal()
        turns = hz * rng.normal(1, 0.0067) * t + phase + side * port + 0.12 * rng.normal()
        ring = ring + volts_from_decibels(level_db) * width * np.exp(-np.pi * width * t) * np.sin(2 * np.pi * turns)
    return ring * (1 - np.exp(-t / 0.00022)) ** 2


def ratchet():
    out, t = np.zeros((2, N + SR)), np.arange(SR // 16) / SR
    for stroke, ticks in enumerate([FIRST_TICKS, SECOND_TICKS, THIRD_TICKS]):
        knock_db, pan_db, scatter_db = GRIPS[stroke]
        phases, ports = np.arange(7) / 2, 0.1 * rng.standard_normal(7)
        for s, db, tilt_db in ticks:
            pawl = 0.17 * rng.standard_normal(len(t)) * volts_from_decibels(-60 * t / 0.0045)
            rebound_at = int(rng.uniform(.0008, .0018) * SR)
            pawl[[4, rebound_at]] += [1, 0.56]
            ring = shell_ring(t, stroke, tilt_db, phases, ports)
            tick = signal.fftconvolve(pawl[None], ring, axes=1)[:, :len(t)]
            knock_level = volts_from_decibels(knock_db + 2.5 * rng.normal() - 60 * t / 0.024)
            knock = np.sin(2 * np.pi * rng.normal(1548, 88) * t) * knock_level
            sound = volts_from_decibels(db - 3.5) * peak(tick) + volts_from_decibels(0.5 * (db + 14.0)) * knock
            pan = pan_db + scatter_db * rng.normal()
            add(out, s, sound, pan, TICK_SCATTER_DB[stroke], wet_db=-36.5)
    return out[:, :N]


def scene():
    roller = ratchet() + drag()
    power = uniform_filter1d(np.mean(roller ** 2, 0), size=9000)
    loud_db = 10 * np.log10(np.abs(power) + 1e-12)
    duck = volts_from_decibels(-.3 * np.clip(loud_db + 50.5, 0, None))
    return roller + taps() + hands() + scuffs() + background(duck)


def roll_off(x):
    return signal.sosfilt(signal.butter(12, 15200, fs=SR, output="sos"), x)


def record(dry):
    top_hz = 11024
    bass_cut = spectrum([(20, -8.5), (70, 0.0), (105, 0.5)])
    splash = spectrum([(top_hz, -6), (11300, -16), (12400, -25), (16000, -34)])
    inside = filtered(dry, lambda hz: bass_cut(hz) * (hz < top_hz))
    beyond = filtered(dry, lambda hz: splash(hz) * (hz >= top_hz))
    slope = uniform_filter1d(np.abs(np.gradient(inside, axis=1)), size=100, axis=1)
    sudden = np.clip(slope / .025, 0, 1) ** 2
    return roll_off(inside + sudden * beyond)


dry = scene()
out = record(dry)
wav_record(out)
```